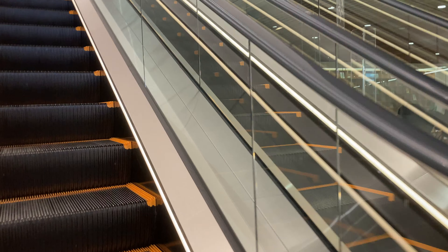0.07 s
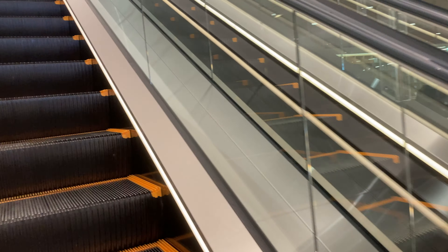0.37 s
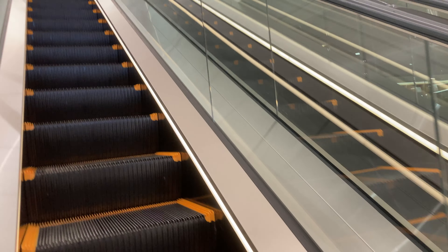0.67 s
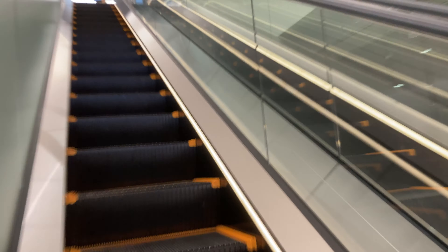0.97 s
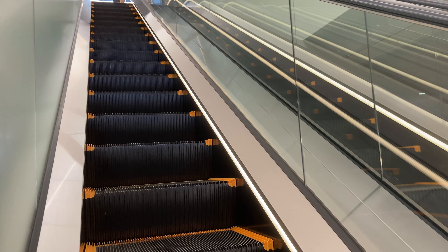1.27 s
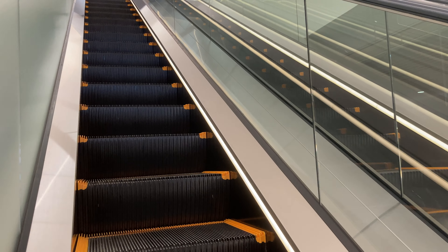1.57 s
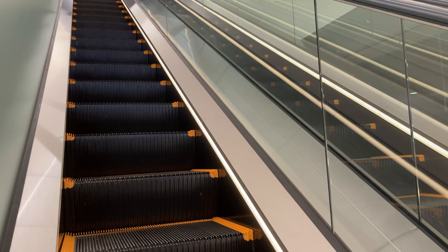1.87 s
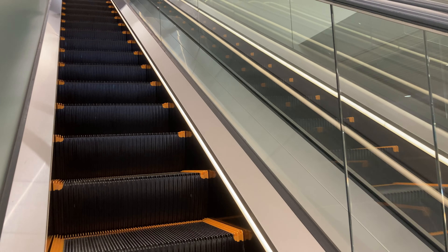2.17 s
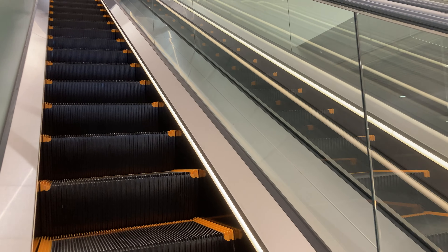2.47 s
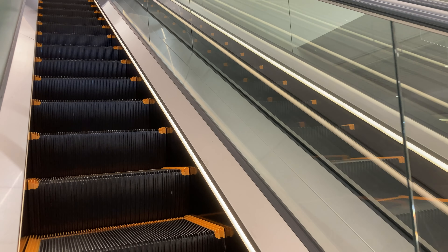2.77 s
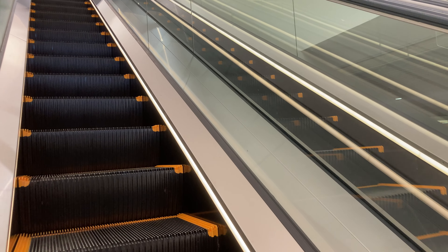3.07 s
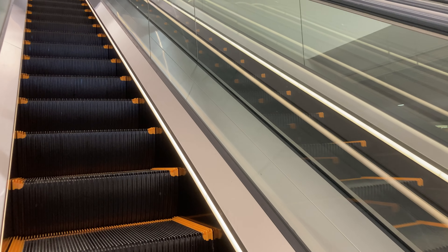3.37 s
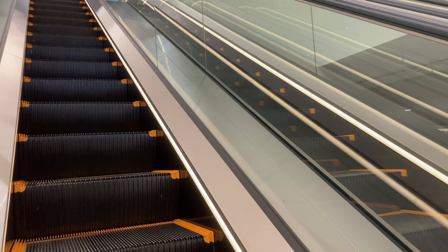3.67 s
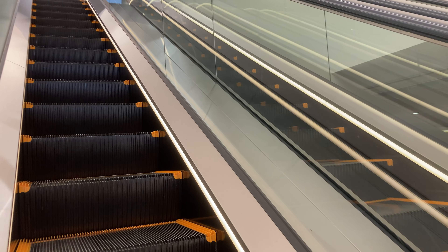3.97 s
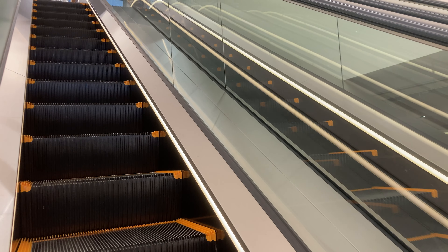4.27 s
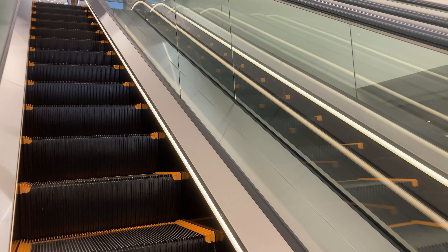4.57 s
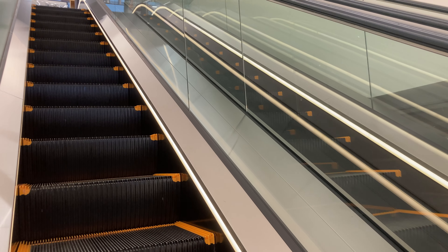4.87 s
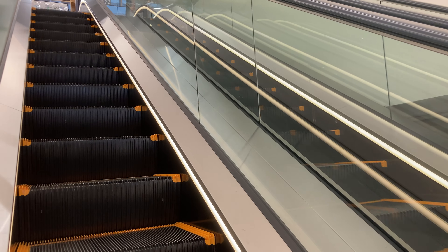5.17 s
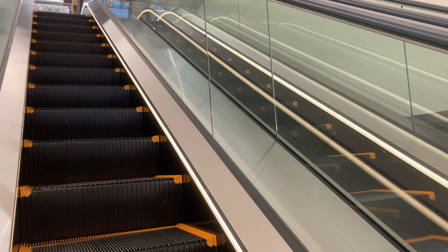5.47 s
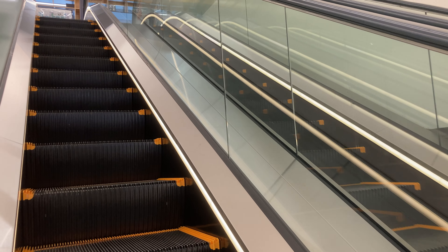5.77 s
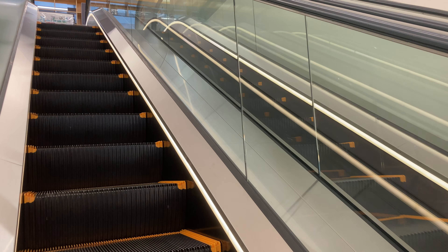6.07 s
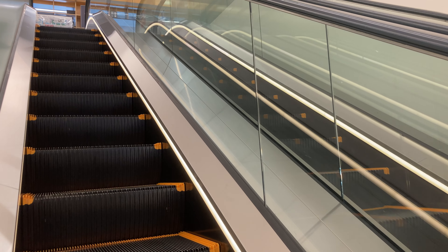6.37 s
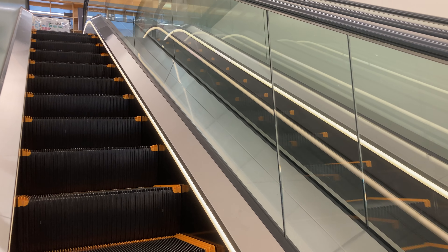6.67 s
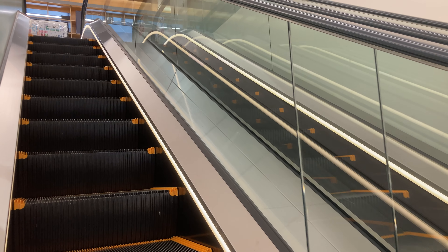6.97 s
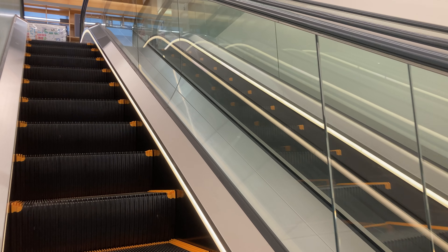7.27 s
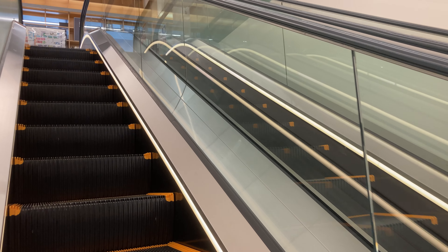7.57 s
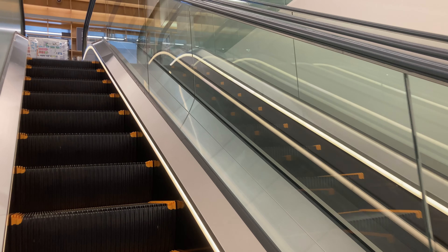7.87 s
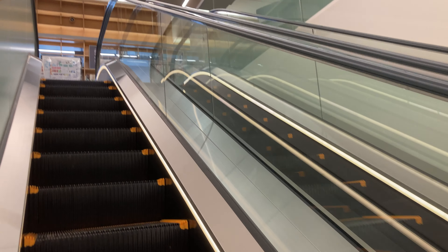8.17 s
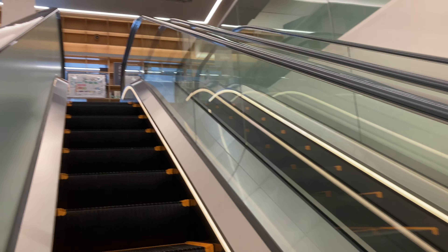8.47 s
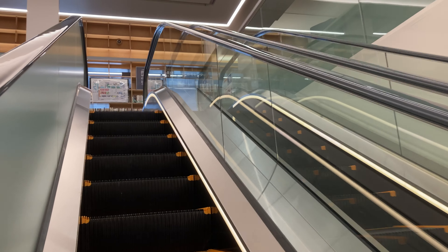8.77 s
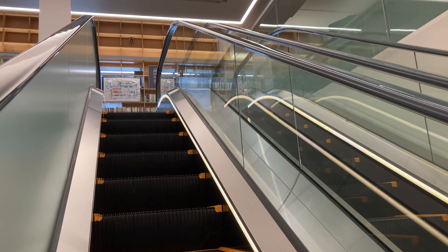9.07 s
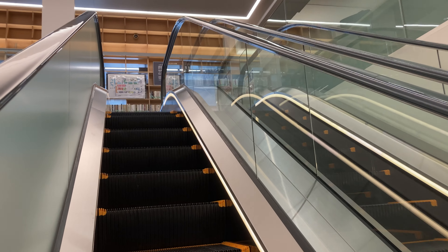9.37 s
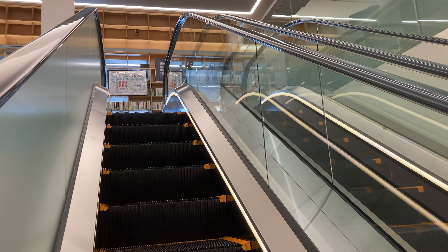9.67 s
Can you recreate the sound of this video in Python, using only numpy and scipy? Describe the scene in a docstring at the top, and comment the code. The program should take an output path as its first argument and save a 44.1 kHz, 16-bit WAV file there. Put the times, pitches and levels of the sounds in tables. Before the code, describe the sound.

Steady deep escalator rumble and motor hum, with light chain ticking, rattles, occasional step clunks and a single thump on the microphone.

```python
"""Escalator ride in a quiet building

Step rollers rumble in the truss and shake its panels. Two drives hum and beat. Chain links tick
about ten times a second, loose parts rattle and a step clunks now and then. The handrail swishes
and squeaks faintly. After a second the hand-held microphone takes one bump."""
import sys
import numpy as np
from scipy import signal
from scipy.fft import rfft, irfft
from scipy.io import wavfile
from scipy.ndimage import uniform_filter1d

SR = 44100
rng = np.random.default_rng(int(sys.argv[2]) if len(sys.argv) > 2 else 0)


def dump_mix(stems):
    """Bounce the given channels to the path in sys.argv[1] as a 16-bit WAV at rate SR."""
    frames = np.atleast_2d(stems).T  # one column per channel
    limited = np.clip(frames, -1, 1)  # hard clip at full scale
    pcm = np.round(limited * 32767).astype(np.int16)
    wavfile.write(sys.argv[1], SR, pcm)


N = 437472


def from_db(db):
    """Decibels to gain."""
    return 10 ** (np.asarray(db) / 20)


def unit_rms(x):
    """Each channel scaled to rms 1."""
    return x / np.sqrt(np.mean(x ** 2, axis=-1, keepdims=True) + 1e-20)


def seconds():
    """Time of each sample."""
    return np.arange(N) / SR


def bins_hz():
    """Frequency of each spectral bin."""
    return np.maximum(np.arange(N // 2 + 1) * SR / N, 1)


def over_time(points):
    """Breakpoints joined linearly over time."""
    return np.interp(seconds(), *np.transpose(points))


def over_hz(points):
    """Breakpoints joined linearly over log frequency."""
    hz, value = np.transpose(points)
    return np.interp(np.log(bins_hz()), np.log(hz), value)


def drift(rate_hz):
    """Slow random curve, rms 1."""
    return unit_rms(irfft(rfft(rng.standard_normal(N)) / (1 + (bins_hz() / rate_hz) ** 2), N))


def strikes(times_s, levels_db, t60_s):
    """Envelope that jumps at each strike and decays."""
    hits = np.zeros(N)
    hits[np.clip(np.asarray(times_s) * SR, 0, N - 1).astype(int)] = from_db(levels_db)
    return signal.lfilter([1], [1, -from_db(-60 / (t60_s * SR))], hits + 1e-18)


def resonance(hz, width_hz):
    """Response of one damped mode, peak 1."""
    f = bins_hz()
    return 1 / (1 + 1j * (f * f - hz * hz) / (f * width_hz))


def modal(modes):
    """Response of parallel modes, each level setting that mode's energy."""
    return sum((-1) ** k * from_db(db) * resonance(hz, width_hz) * np.sqrt(SR / np.pi / width_hz)
               for k, (hz, width_hz, db) in enumerate(modes))


def noise(response):
    """Diffuse noise with the given density per Hz."""
    return in_hall(*(rfft(rng.standard_normal((2, N))) * response * np.sqrt(SR / 2)))


def excite(force, response):
    """Rough contact rings a body; rms follows the force."""
    contact = rfft(force * rng.standard_normal((2, N)))
    return in_hall(*(contact * response / np.sqrt(np.mean(abs(response) ** 2))))


# Roller spectrum: freq_hz, density_db
ROLLER_SPECTRUM = [(20, -90), (30, -79), (45, -60.5), (62, -52.5), (95, -50.5), (122, -58.5), (160, -64.5),
                   (330, -67), (560, -72), (1000, -78.5), (2000, -86), (3000, -92), (4600, -99),
                   (9000, -116)]
# Rumble weight along the ride: time_s, gain_db
ROLLER_LOAD = [(0, 1), (4.5, 0), (6.3, 0.9), (8.3, 0), (9.9, 1)]
def rollers(gain_db=0.39, flutter_db=0.98):
    """Many rollers on their tracks make a deep, fluttering roar."""
    roar = noise(from_db(over_hz(ROLLER_SPECTRUM)))
    return roar * from_db(gain_db + over_time(ROLLER_LOAD) + flutter_db * drift(8.5))


# Truss and side panel modes: freq_hz, width_hz, level_db
PANEL_MODES = [(94.6, 7.6, -48), (170.55, 4.1, -48), (246, 13, -46.5), (324.5, 46, -46.5),
               (343.9, 12.7, -45), (391.8, 6.2, -55), (480.5, 26, -53.5), (551.3, 8.1, -57.5),
               (694.5, 35, -50.5), (798.5, 21, -53)]
# Jolt strength along the ride: time_s, gain_db
PANEL_SHAKE = [(0, -2), (1.4, 0.5), (3, 0), (4.5, -0.5), (5.2, -1.6), (7.3, 1), (8.3, -1.5), (9.9, -3)]
def panels(gain_db=-0.5, jolts_per_s=600, spread_db=2.5, tyre_cutoff_hz=2490, roam_db=2.5):
    """Roller jolts, dulled by soft tyres, ring the panels; two sets of modes trade the lead."""
    jolts = (rng.random((2, N)) < jolts_per_s / SR) * rng.standard_normal((2, N))
    jolts = unit_rms(jolts * from_db(spread_db * drift(5.0) + over_time(PANEL_SHAKE)))
    tyre = 1 / (1 + (bins_hz() / tyre_cutoff_hz) ** 4)
    lead_db = roam_db * np.tanh(drift(0.46))
    even = rfft(jolts * from_db(lead_db)) * modal(PANEL_MODES[::2])
    odd = rfft(jolts * from_db(-lead_db)) * modal(PANEL_MODES[1::2])
    return from_db(gain_db) * in_hall(*((even + odd) * tyre))


# Main gear tone at the top of its swells: time_s, level_db
MAIN_GEAR_LEVEL = [(0, -48), (2.6, -41), (3.8, -35.5), (5.1, -37.5), (6.1, -44), (6.7, -38.5), (7.3, -38),
                   (8.8, -41), (9.9, -45.5)]
# Neighbouring gear tone, loud where the ride passes it: time_s, level_db
SECOND_GEAR_LEVEL = [(.3, -39.5), (1.1, -41.5), (2.6, -47.5), (3.6, -41), (4.3, -62), (8.1, -53.5),
                     (8.7, -39.5), (9.9, -43)]
def drives(pitch_hz=295.7, wander_hz=0.8, beat_hz=4.73, first_beat_s=.173, echo_db=-5,
           swell_period_s=1.2, first_swell_s=.22, flutter_db=3.5, pan_db=-1.5, second_pan_db=0.5):
    """Two gear tones beat; the main one swells as the ride crosses its standing waves."""
    t = seconds()
    turns = np.cumsum(pitch_hz + wander_hz * drift(3.8)) / SR
    echo = from_db(echo_db)
    standing = (1 + echo * np.exp(2j * np.pi * (t - first_swell_s) / swell_period_s)) / (1 + echo)
    beat = np.exp(2j * np.pi * beat_hz * (t - first_beat_s))   # the second drive runs faster
    sides = np.array([[.5], [-.5]])
    main = standing * from_db(over_time(MAIN_GEAR_LEVEL) + flutter_db * drift(12.5) + pan_db * sides)
    second = beat * from_db(over_time(SECOND_GEAR_LEVEL) + second_pan_db * sides)
    path_rad = 0.56 * np.array([drift(3.8), drift(1.6)])
    return np.sqrt(2) * np.real((main + second) * np.exp(1j * (2 * np.pi * turns + path_rad)))


# Links that snap in hard: start_s, level_db, knock_offset_db, ring_centre_hz
HARD_TICKS = [(1.232, -40, -9, 4300), (1.426, -43.5, 3, 1850), (1.541, -45, -3, 5400),
              (1.697, -46, 4, 2700), (1.81, -48, 3, 1850), (1.914, -42, 3.5, 3900), (2.013, -46, -1, 5400),
              (2.084, -49.5, 11.5, 2700), (2.214, -44, -6, 5400), (2.41, -46, -7, 5370),
              (2.605, -47, 0, 5400), (2.727, -50.5, 10.5, 2400), (2.805, -48, 3, 1850),
              (2.907, -48, 4, 1850), (3.051, -47.5, 1, 5400), (3.142, -43.5, 3.5, 3920),
              (3.193, -48, -11, 10000), (3.993, -40.5, 0.5, 4760), (4.585, -51, 2, 2700),
              (4.682, -47.5, 10, 1790), (4.776, -42, 0.5, 3930), (5.049, -51, 4, 9930),
              (5.15, -46, 2, 10000), (5.247, -50, 8, 2700), (5.344, -42, -2, 5900), (5.437, -53, 7, 2700),
              (5.538, -47, -1, 5400), (5.738, -42, -1, 4800), (5.843, -42, -3, 6300),
              (5.945, -51, -6, 9200), (6.034, -51, 5, 5360), (6.131, -48, -3, 3900), (6.227, -49, 7, 2700),
              (6.326, -44.5, -8, 9400), (7.259, -40.5, -2, 3900), (7.466, -42.5, 0, 4200),
              (7.659, -51, 7.5, 6740), (7.869, -39.5, -3, 4200), (7.165, -47, -8, 10040),
              (9.835, -45, -5, 9970)]
# Chain lag behind an even pace: time_s, lag_s
LINK_LAG = [(0, .04), (4.6, .04), (5.1, .01), (6.4, .004), (6.85, .05), (7.9, .052), (8.6, .03),
            (9.9, .054)]
# Track knock spectrum: freq_hz, gain_db
TRACK_SPECTRUM = [(500, 4), (1200, 5.5), (2400, 0.5), (4500, -15.5), (9000, -35)]
# Link modes: freq_hz, width_hz, level_db
LINK_MODES = [(1810, 200, -3), (2280, 150, 0), (2740, 99, 5), (3600, 440, 4.5), (3920, 740, 7),
              (5480, 320, -10), (6640, 150, -3), (8540, 390, 0), (9100, 500, -13), (9920, 230, 2),
              (10800, 400, -6)]
def chain(period_s=.0988, jitter_s=.003, seat_s=.003, soft_db=-51, soft_knock_db=-6, spread_db=1.5,
          snap_gain_db=-9.5, hall_gain_db=-9, knock_gain_db=-0.5, ring_gain_db=-11.5):
    """Each link seats on the sprocket with a snap, a dull knock and a short ring."""
    hard_s, hard_db, hard_knock_db, hard_hz = np.transpose(HARD_TICKS)
    links_s = np.arange(0, N / SR, period_s)
    links_s = links_s + np.interp(links_s, *np.transpose(LINK_LAG))
    is_soft = abs(links_s[:, None] - hard_s).min(axis=1) > period_s / 2
    late, strength, weight, octaves = rng.standard_normal((len(links_s), 4)).T
    times_s = np.r_[links_s + jitter_s * late, hard_s]
    ticks_db = np.r_[np.where(is_soft, soft_db + spread_db * np.tanh(strength), -np.inf), hard_db]
    knocks_db = ticks_db + np.r_[soft_knock_db + spread_db * np.tanh(weight), hard_knock_db]
    centres_hz = np.r_[np.median(hard_hz) * 2 ** octaves, hard_hz]
    direct = strikes(times_s, ticks_db + snap_gain_db, t60_s=0.049)
    tail = strikes(times_s, ticks_db + snap_gain_db + hall_gain_db, t60_s=0.26)
    snap = excite(uniform_filter1d(direct + tail, int(seat_s * SR)), modal(LINK_MODES))
    knock_force = strikes(times_s, knocks_db + knock_gain_db, t60_s=.085)
    knock = excite(knock_force, from_db(over_hz(TRACK_SPECTRUM)))
    ring = link_ring(times_s, np.maximum(ticks_db, knocks_db) + ring_gain_db, centres_hz)
    return snap + knock + ring


def link_ring(times_s, levels_db, centres_hz, t60_s=.05, detune=.008, spread_db=2.5, db_per_octave=16):
    """Each link rings slightly detuned, loudest near the pitch its contact favours."""
    link = np.searchsorted(np.sort(times_s), seconds())
    detuned_s = np.cumsum(1 + detune * rng.standard_normal(len(times_s) + 1)[link]) / SR
    out = 0
    for hz, _, _ in LINK_MODES:
        loss_db = db_per_octave * abs(np.log2(hz / centres_hz))
        share_db = spread_db * rng.standard_normal(len(times_s)) - loss_db
        tone = np.sin(2 * np.pi * (hz * detuned_s + rng.random((2, 1))))
        out += strikes(times_s, levels_db + share_db, t60_s) * tone
    return out


# Step knocks: start_s, level_db, centre_hz, spread_octaves, boom_db
STEP_KNOCKS = [(.059, -32.5, 1800, 1, -55), (.065, -28.5, 540, .25, -50), (.077, -32, 1000, 1.2, -45),
               (.549, -33, 1450, 1.1, -38), (1.611, -30.5, 720, .15, -31), (2.0, -36, 550, .8, -30),
               (2.435, -38.5, 640, .6, -37), (2.589, -36.5, 850, .6, -55), (2.884, -44, 430, .5, -33),
               (3.56, -44, 500, .7, -35), (7.355, -43, 400, .7, -31), (7.435, -39, 520, .7, -35),
               (9.635, -37.5, 720, .5, -40)]
# Step modes: freq_hz, width_hz, level_db
STEP_MODES = [(421, 51, 6), (543, 49, 10.5), (715, 55, 1.5), (850, 160, 0.5), (1006, 89, 4.5),
              (1174, 140, -2), (1500, 370, -6), (2160, 530, -2), (3280, 5000, -4.5)]
def step_clunks(gain_db=3.0, hall_gain_db=-20.5, rise_s=0.00018):
    """A step knocks in its guides: its modes ring, the tread booms, the hall answers."""
    step = modal(STEP_MODES)
    pole = np.exp(-1 / (rise_s * SR))
    ring = 0
    for start_s, db, hz, octaves, _ in STEP_KNOCKS:
        direct = strikes([start_s], db, t60_s=0.09)
        tail = strikes([start_s], db + hall_gain_db, t60_s=0.56)
        force = signal.lfilter([1 - pole], [1, -pole], direct + tail)
        ring += excite(force, step / (1 + (np.log2(bins_hz() / hz) / octaves) ** 2))
    times_s, *_, booms_db = np.transpose(STEP_KNOCKS)
    boom = excite(strikes(times_s, booms_db, t60_s=0.15), resonance(hz=298, width_hz=160) ** 2)
    return from_db(gain_db) * ring + boom


# Microphone case modes: delay_s, pitch_hz, level_db, t60_s
CASE_RINGS = [(.002, 1040, -22, 0.029), (.0035, 666, -20, 0.021), (.0059, 400, -10, .026)]
# Case clicks: delay_s, level_db, t60_s, centre_hz, width_hz
CASE_SNAPS = [(.0004, -27.5, .02, 2200, 3000), (.0054, -21.5, .007, 3600, 4500),
              (.0054, -21.5, .005, 10800, 5500), (.0175, -16, .004, 11200, 3800),
              (.0177, -24, .005, 4400, 3600)]
def microphone_bump(start_s=.967, left_lag_s=0.00029, click_gain_db=-3.5, thud_db=-3.5,
                    thud_delay_s=0.0038, thud_s=0.035, first_hz=230, last_hz=67.6, glide_s=0.008):
    """The bumped case clicks, rings briefly and gives one thud of falling pitch."""
    since_s = seconds() - start_s - left_lag_s * np.array([[1], [0]])
    age_s = np.maximum(since_s - thud_delay_s, 0)
    turns = last_hz * age_s + (first_hz - last_hz) * glide_s * (1 - np.exp(-age_s / glide_s))
    swell = np.sin(np.pi * np.minimum(age_s / thud_s, 1) ** 1.02)
    out = from_db(thud_db) * swell * np.cos(2 * np.pi * turns)
    for delay_s, hz, db, t60_s in CASE_RINGS:
        ring_s = np.clip(since_s - delay_s, 0, 2 * t60_s)
        out += np.sin(2 * np.pi * hz * ring_s) * from_db(db - 60 * ring_s / t60_s)
    for delay_s, db, t60_s, hz, width_hz in CASE_SNAPS:
        force = strikes([start_s + delay_s], db + click_gain_db, t60_s)
        out += force.std() * unit_rms(excite(force, resonance(hz, width_hz) ** 2))
    return out


# Motor and gear tones: pitch_hz, width_hz, level_db
MOTOR_TONES = [(100.3, 1.8, -51), (284.3, 6.9, -51.5), (418, 2, -59), (596, 15, -70), (886, 20, -59.5),
               (1184, 12, -64)]
def motor_whines(gain_db=-1.5, waver_db=3.0):
    """Motors and gears add weaker, unsteady tones."""
    lines = sum(from_db(db) * abs(resonance(hz, width_hz)) ** 2 * np.sqrt(4 / np.pi / width_hz)
                for hz, width_hz, db in MOTOR_TONES)
    return from_db(gain_db + waver_db * drift(1.3)) * noise(lines)


# Rasp along the ride: time_s, level_db
RASP_LEVEL = [(0, -66), (2.4, -57), (3.2, -56), (4.5, -60), (5.1, -48), (5.9, -57), (7.3, -59), (8.6, -55),
              (9.7, -52.5)]
def rough_whine():
    """A narrow rasp, perhaps a worn bearing, swells as the ride passes it."""
    return excite(from_db(over_time(RASP_LEVEL)), resonance(hz=864, width_hz=153) ** 2)


# Steel skirt modes: freq_hz, width_hz, level_db
SKIRT_MODES = [(1174, 76, -3), (1440, 110, -4), (1775, 51, 3), (2080, 76, -0.5), (2250, 120, -2.5),
               (2770, 200, -5), (3830, 880, -4)]
def skirt_rattle(level_db=-49.5, hits_per_s=32, spread_db=12.5, cutoff_hz=4500):
    """Loose step parts chatter at random against the thin skirts."""
    when, weakness = rng.random((int(hits_per_s * N / SR), 2)).T
    force = strikes(when * N / SR, level_db - spread_db * weakness, t60_s=0.07)
    return excite(force, modal(SKIRT_MODES) / (1 + (bins_hz() / cutoff_hz) ** 2))


# Handrail rubs, plus one short rattle just after the link at 5.34 s: peak_s, length_s, level_db, centre_hz,
# width_hz
RAIL_RUBS = [(0.27, 0.31, -59, 8500, 9000), (0.52, 0.26, -58.5, 7000, 9800), (1.204, .03, -45, 2280, 650),
             (1.236, 0.064, -47, 2160, 650), (1.222, .07, -60, 5100, 800), (2.025, 0.055, -56, 2230, 600),
             (5.354, 0.033, -54, 2800, 1500), (6.9, 0.7, -57.5, 2010, 590), (5.65, 0.1, -52, 3200, 3900)]
# Handrail squeaks: peak_s, length_s, level_db, top_pitch_hz, droop_hz
RAIL_SQUEAKS = [(.28, .13, -67, 11450, 450), (.54, .17, -72, 10550, 250), (3.745, .14, -63, 4325, 8),
                (7.29, .17, -65, 3110, 10), (8.238, .07, -64, 4335, 15)]
def handrail(waver=0.00197):
    """Rubber swishes along its guide and squeaks where it sticks, pitch arching with pressure."""
    def parabola(peak_s, length_s):
        return np.minimum((2 * (seconds() - peak_s) / length_s) ** 2, 20)

    swish = squeak = 0
    for peak_s, length_s, db, hz, width_hz in RAIL_RUBS:
        force = from_db(db) * np.exp(-parabola(peak_s, length_s))
        swish += excite(force, resonance(hz, width_hz) ** 2)
    unsteady = 1 + waver * drift(25.0)
    for peak_s, length_s, db, hz, droop_hz in RAIL_SQUEAKS:
        fall = parabola(peak_s, length_s)
        turns = np.cumsum((hz - droop_hz * fall) * unsteady) / SR
        squeak += np.sqrt(2) * from_db(db) * np.exp(2j * np.pi * turns - fall)
    return swish + in_hall(rfft(squeak.real), rfft(squeak.imag))


# Double click: start_s, level_db
CRISP_CLICKS = [(8.602, -51), (8.629, -44)]
def crisp_clicks():
    """Something small and hard, perhaps grit, clicks twice."""
    force = strikes(*np.transpose(CRISP_CLICKS), t60_s=0.013)
    return excite(force, resonance(hz=5140, width_hz=3800) ** 2)


# Noise floor: freq_hz, density_db
HISS_SPECTRUM = [(2000, -108), (5000, -102), (7600, -100.5), (9200, -100), (11000, -101.5), (12800, -104.5),
                 (16000, -107.5)]
def hiss(gain_db=-0.27):
    """Thin, even hiss of hall and microphone."""
    return noise(from_db(over_hz(HISS_SPECTRUM) + gain_db))


# Left-right likeness in the hall: freq_hz, correlation
HALL_CORRELATION = [(60, 0.99), (130, 0.97), (220, 0.88), (370, 0.65), (480, 0.098), (600, -0.4),
                    (900, 0.16), (3000, -0.012), (6000, 0.093)]
def in_hall(mid, side):
    """Two unrelated spectra become diffuse stereo: alike in the bass, apart above."""
    alike = np.clip(over_hz(HALL_CORRELATION), -.99, .99)
    return irfft(np.sqrt(1 + alike) * mid + np.sqrt(1 - alike) * side * [[1], [-1]], N) / np.sqrt(2)


def scene():
    """The running escalator and the bump."""
    drone = rollers() + hiss() + panels() + drives() + motor_whines()
    impacts = chain() + skirt_rattle() + step_clunks()
    return drone + impacts + rough_whine() + handrail() + crisp_clicks() + microphone_bump()


def record(dry, port_lag_s=0.0002185, crossover_hz=6100, cutoff_hz=15800):
    """Two close ports: mids lean left; in the treble, left is the right side, inverted and late."""
    left, right = rfft(dry)
    shared = 1 / (1 + (crossover_hz / bins_hz()) ** 12)
    late_right = right * np.exp(-2j * np.pi * bins_hz() * port_lag_s)
    left = np.sqrt(1 - shared) * left - np.sqrt(shared) * late_right
    lean_db = over_hz([(100, -1.1), (350, -0.5), (650, 2.5), (1600, 1.0), (3200, 3.0), (7500, -1.0)])
    out = irfft(np.array([left, right]) * from_db(lean_db * np.array([[.5], [-.5]])), N)
    return signal.sosfilt(signal.butter(24, cutoff_hz, fs=SR, output="sos"), out)


dry = scene()
out = record(dry)
dump_mix(out)
```